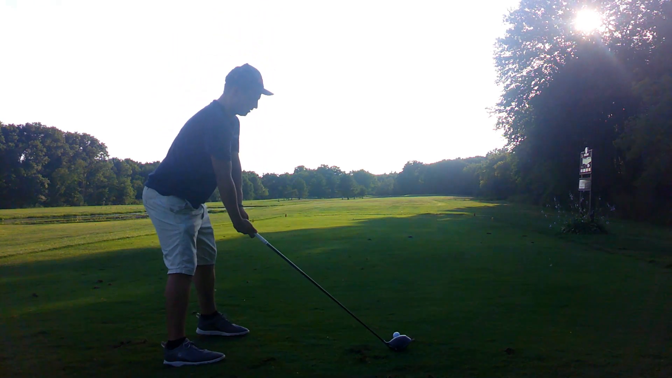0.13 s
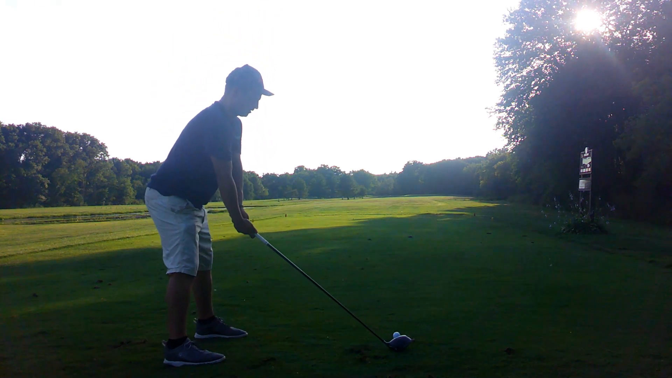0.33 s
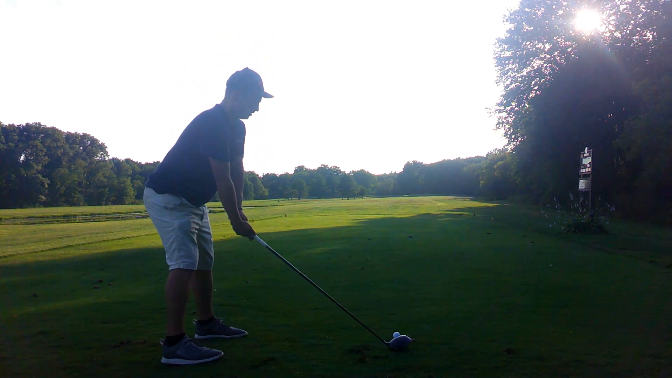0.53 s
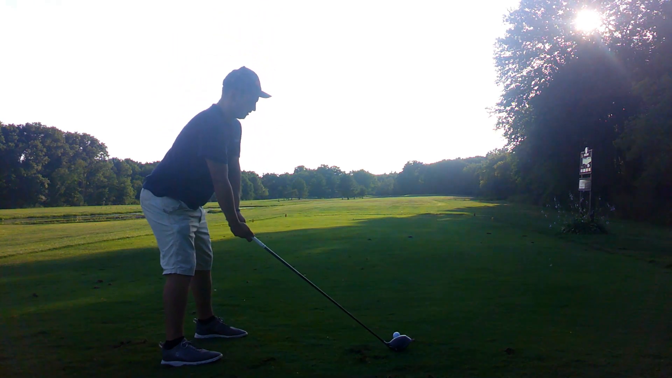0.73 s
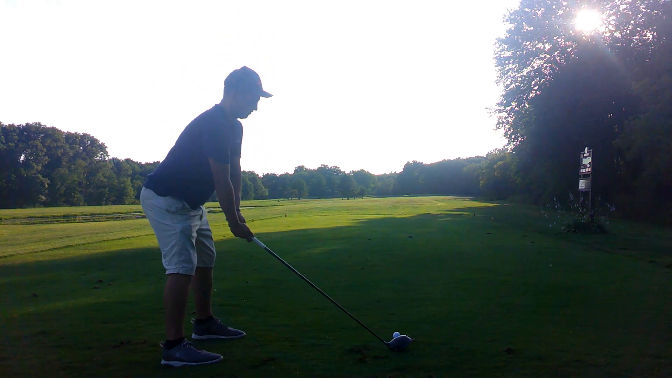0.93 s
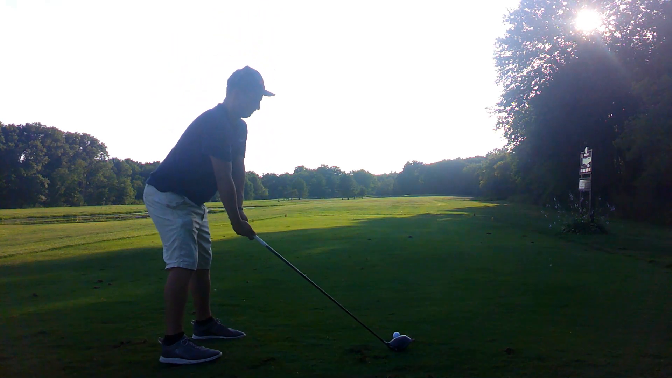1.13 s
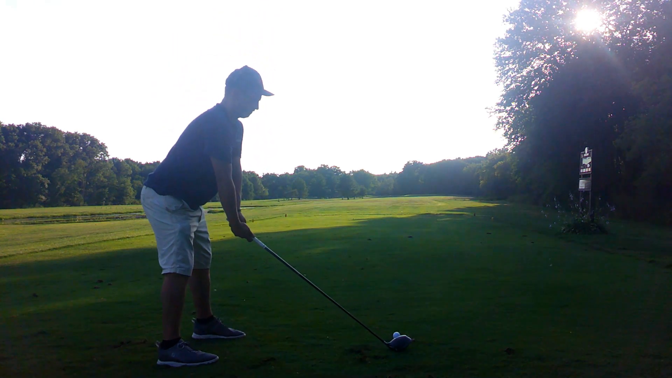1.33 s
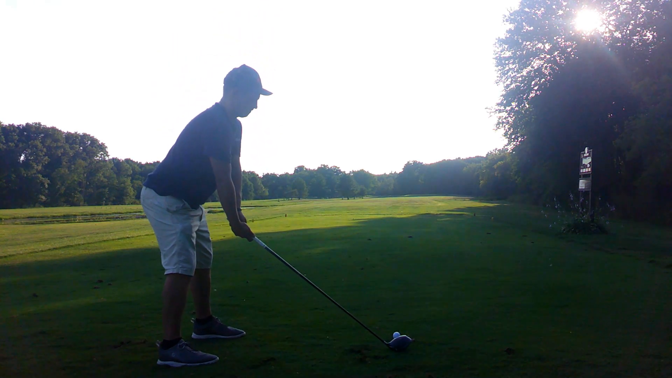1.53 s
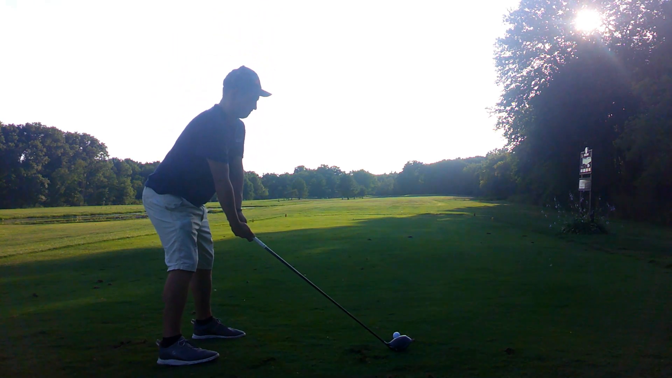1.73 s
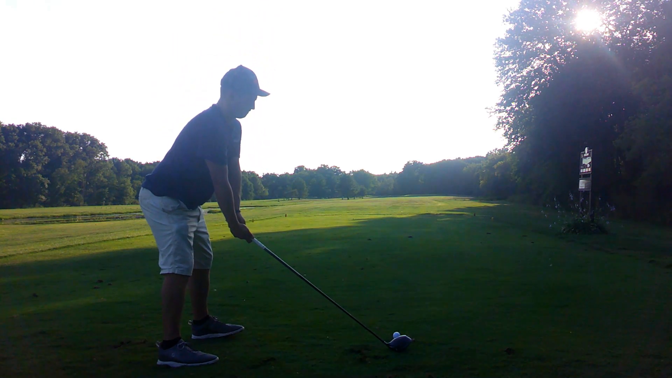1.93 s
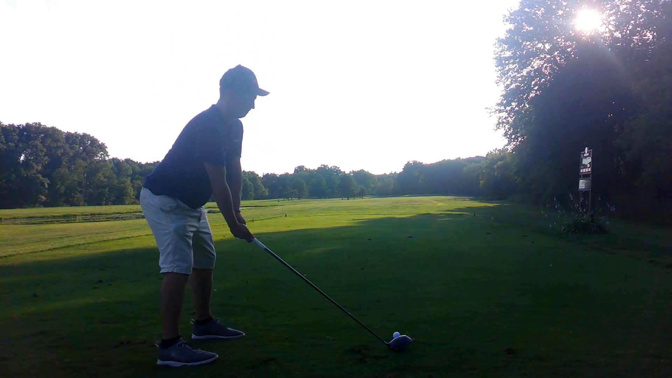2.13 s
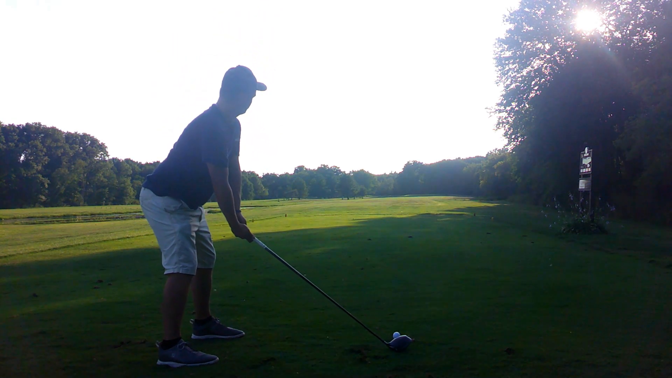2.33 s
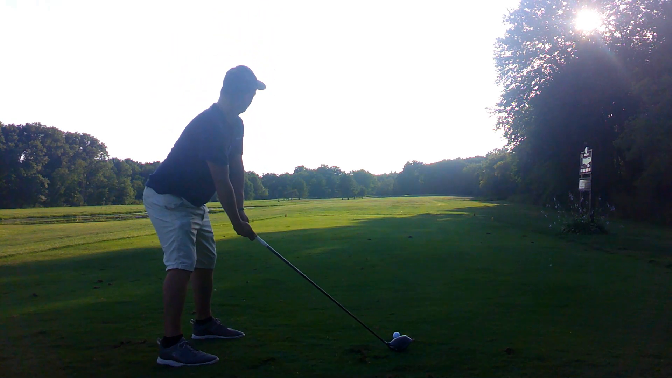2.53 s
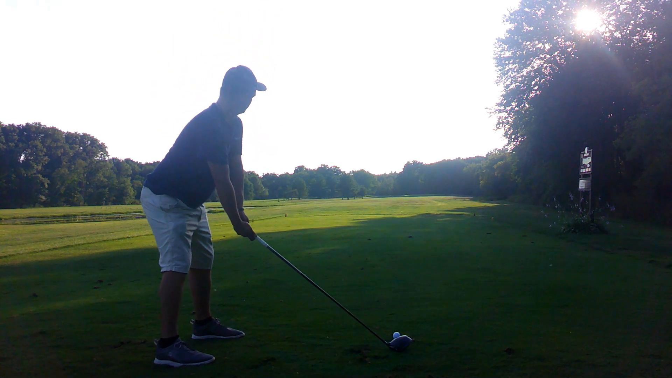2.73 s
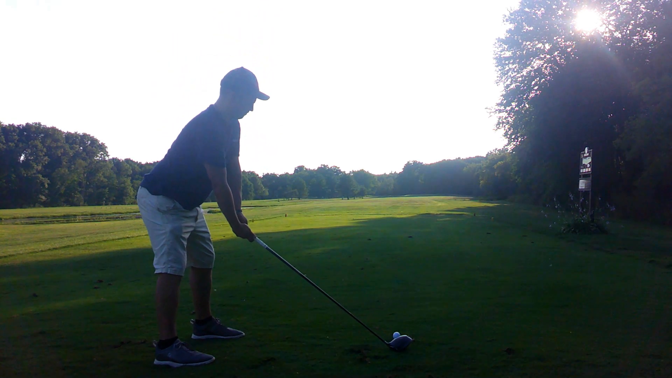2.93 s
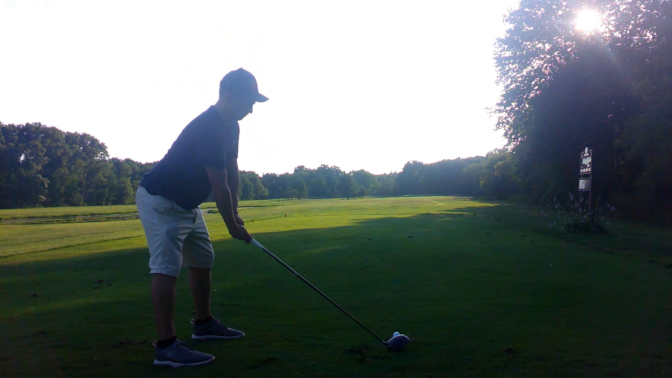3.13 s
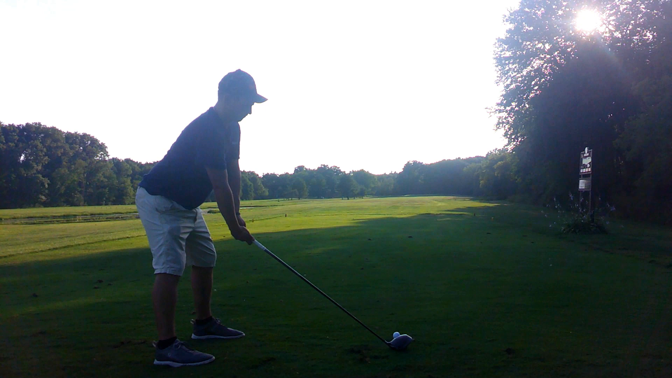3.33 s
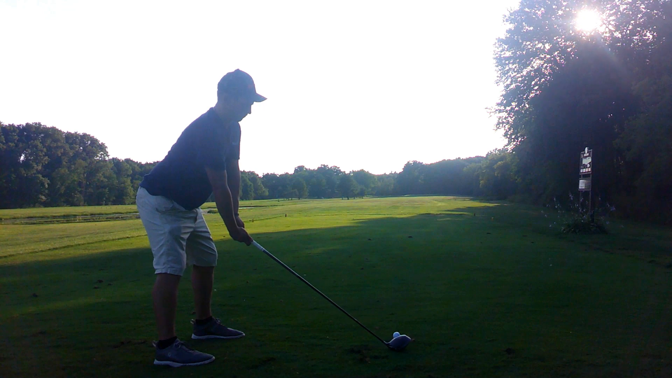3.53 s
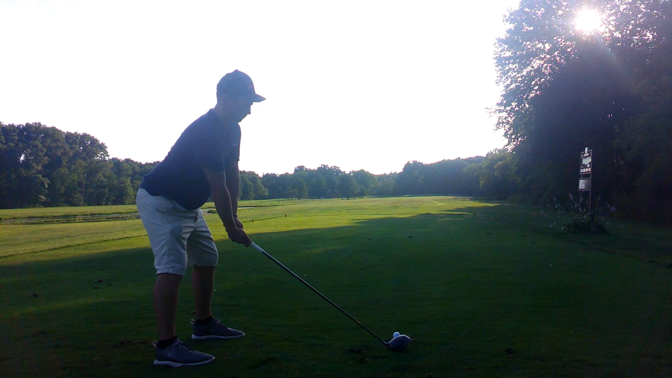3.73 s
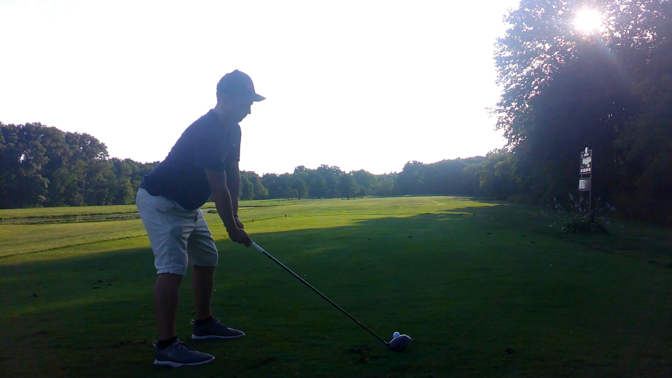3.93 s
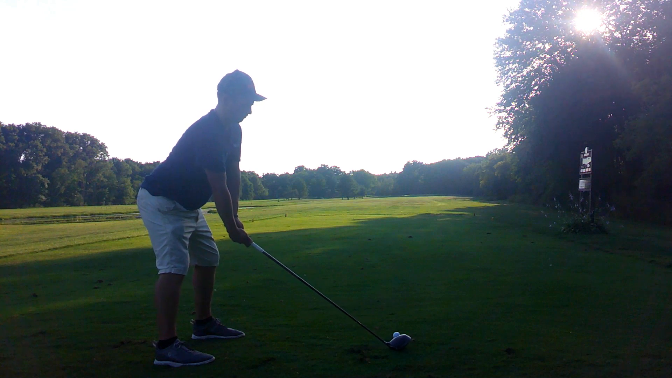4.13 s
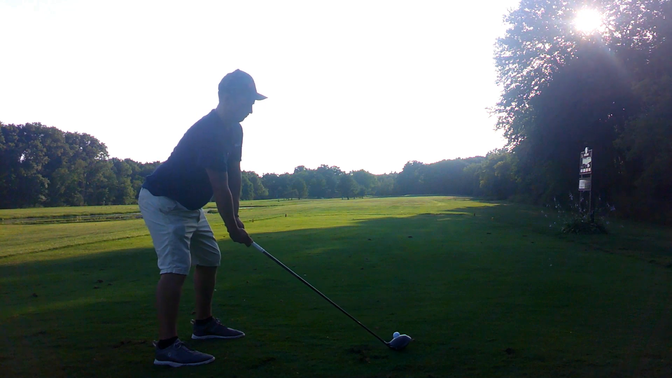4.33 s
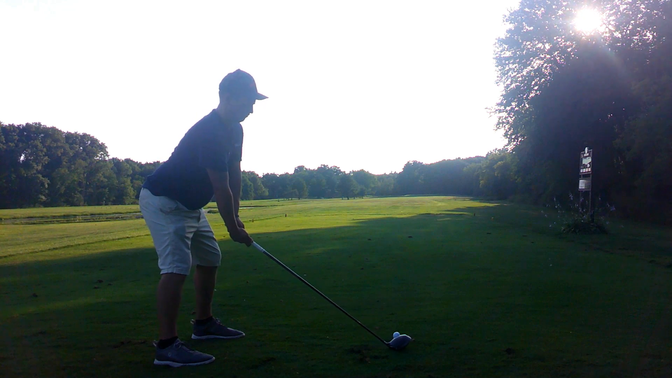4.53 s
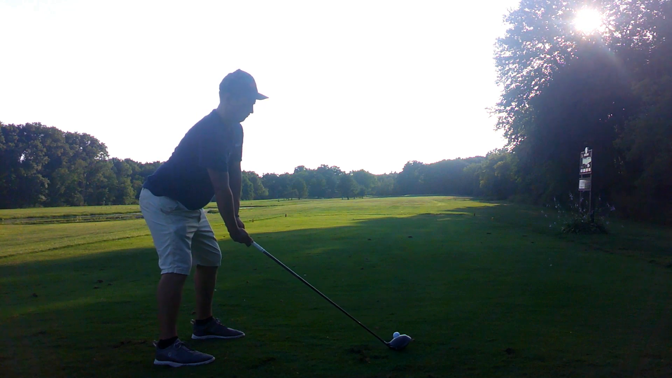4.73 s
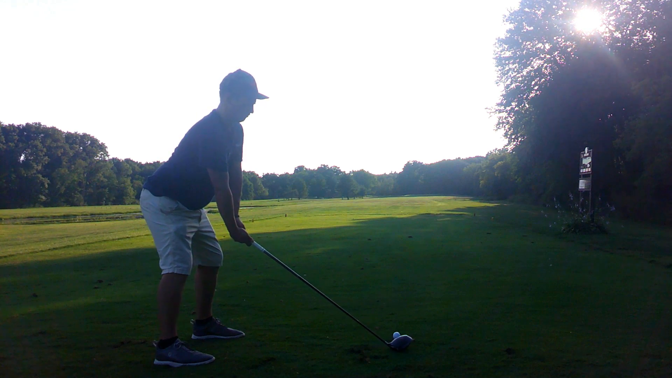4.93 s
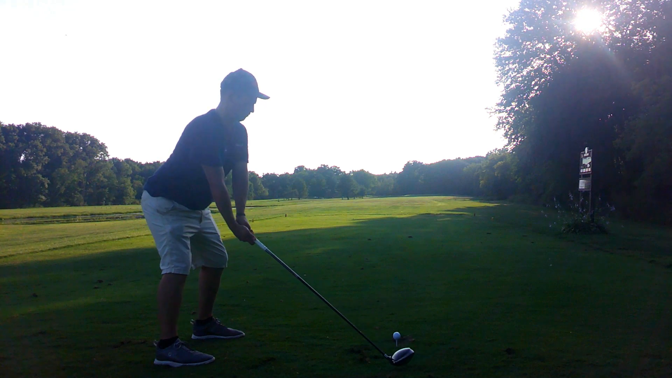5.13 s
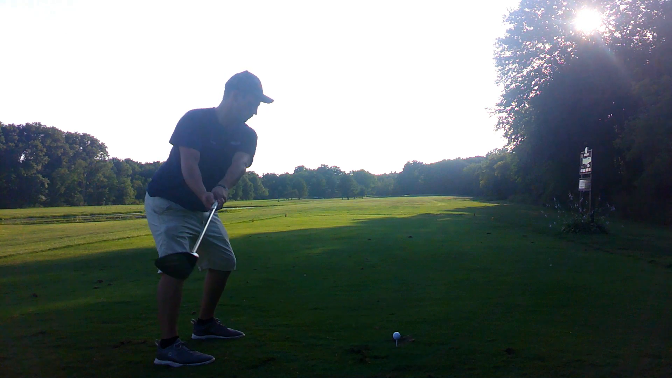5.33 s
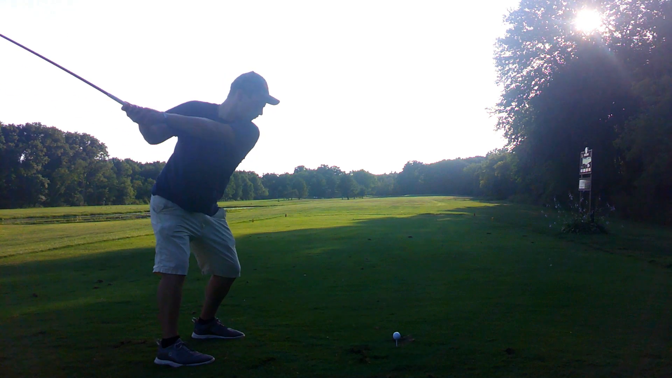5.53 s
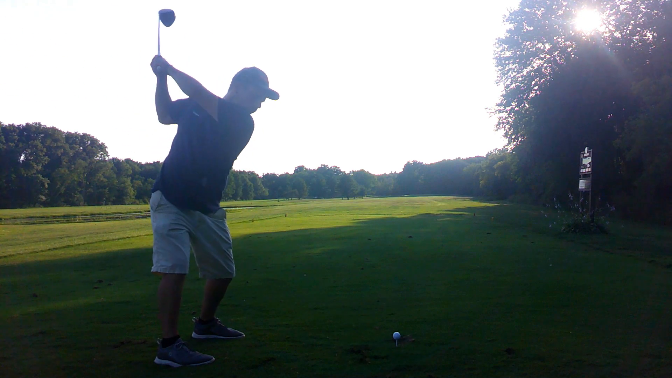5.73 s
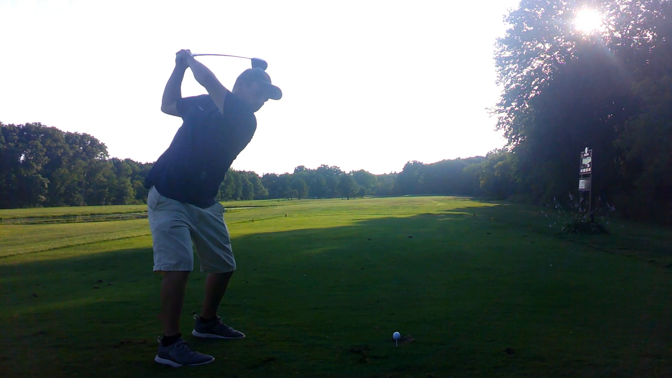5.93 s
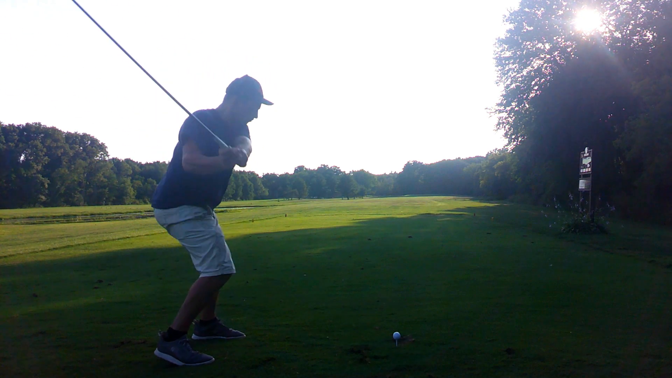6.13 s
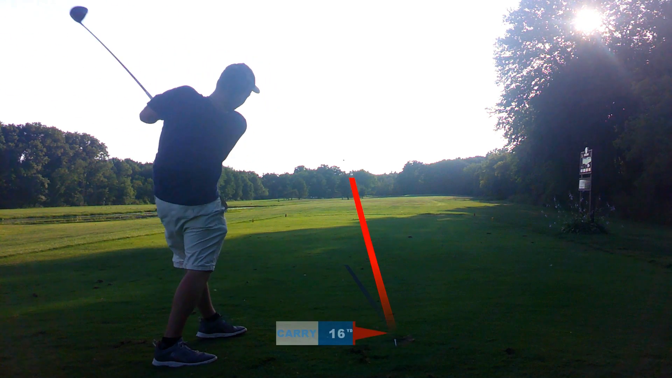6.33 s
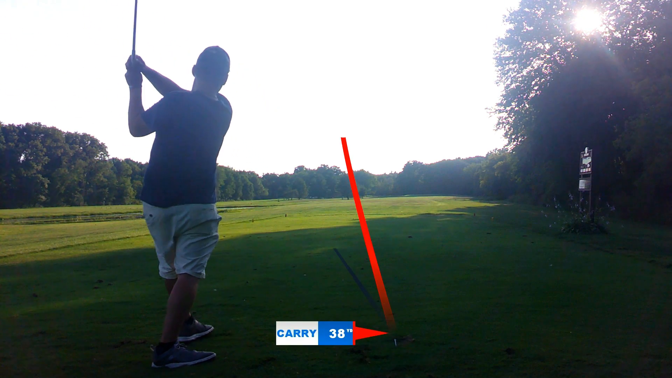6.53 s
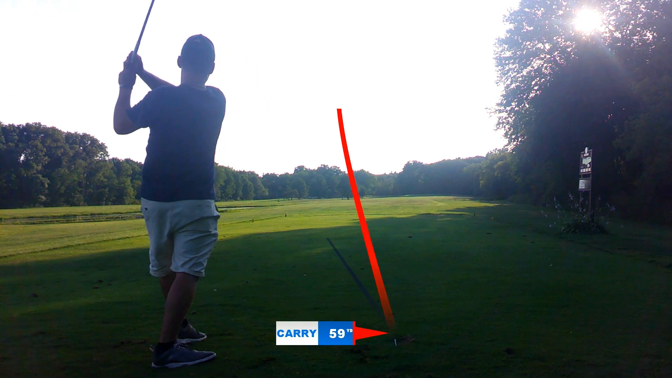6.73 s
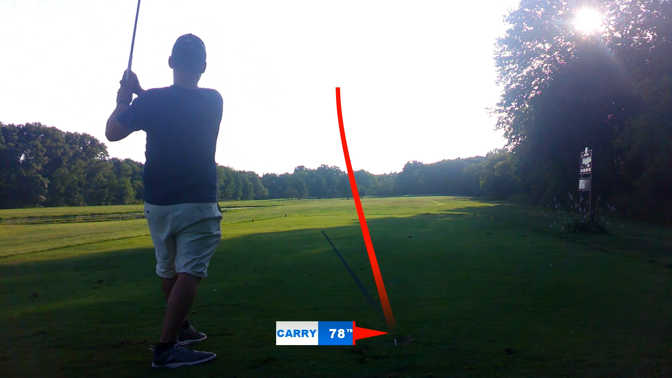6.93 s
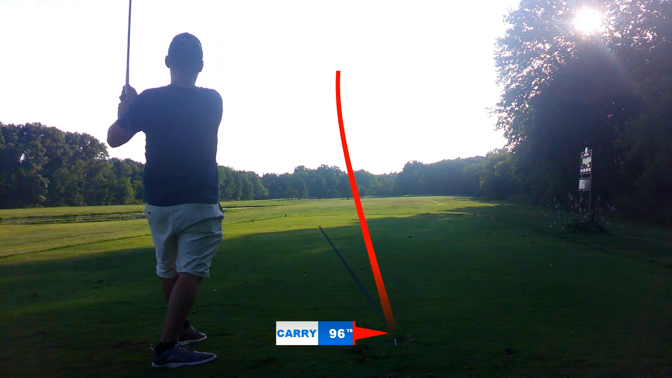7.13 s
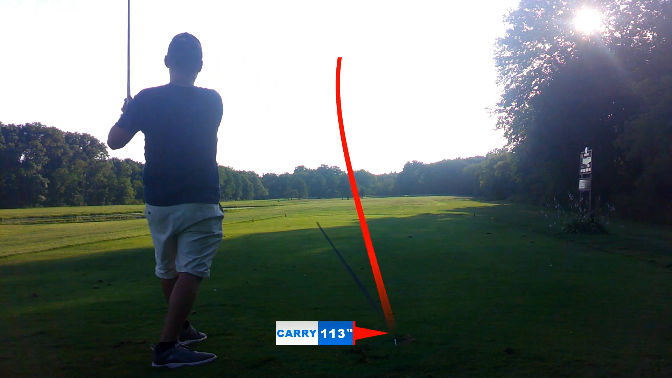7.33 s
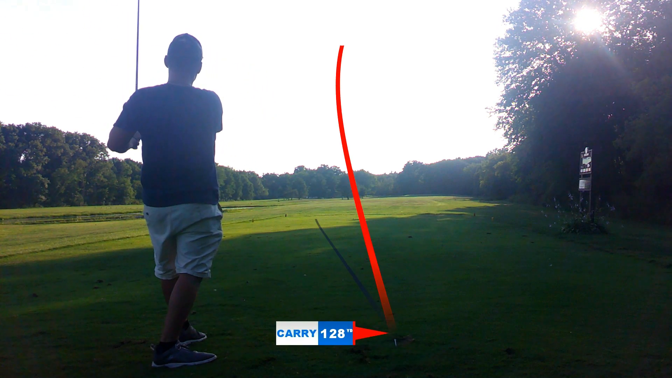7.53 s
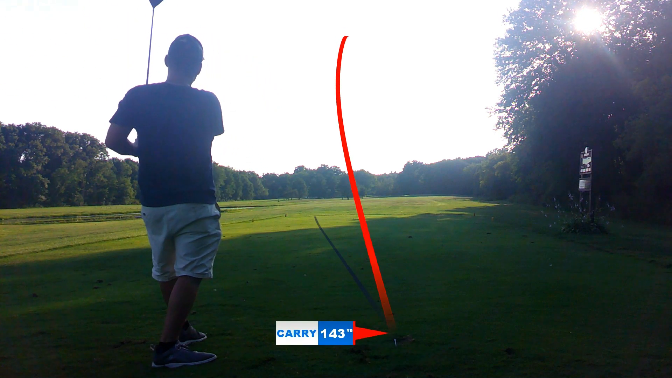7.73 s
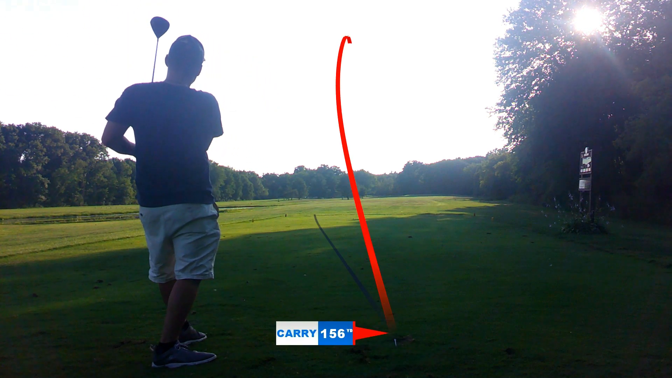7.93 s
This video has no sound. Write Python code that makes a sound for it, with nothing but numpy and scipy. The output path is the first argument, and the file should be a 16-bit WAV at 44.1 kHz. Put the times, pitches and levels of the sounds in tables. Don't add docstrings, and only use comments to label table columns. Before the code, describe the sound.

Distant road rush swells and recedes over faint leaf hiss before a golf club swishes and smacks a ball with a bright, overloaded metallic crack.

```python
import sys
import numpy as np
from scipy import signal
from scipy.fft import rfft, irfft, next_fast_len
from scipy.io import wavfile
from scipy.ndimage import uniform_filter1d

SR = 44100
rng = np.random.default_rng(int(sys.argv[2]) if len(sys.argv) > 2 else 0)


def gain_from_decibels(decibels):
    exponent = np.asarray(decibels, float) / 20
    return 10 ** exponent


def materialize(psi):
    bounded = np.clip(np.atleast_2d(psi).T, -1, 1)
    quanta = np.round(bounded * 32767).astype(np.int16)
    wavfile.write(sys.argv[1], SR, quanta)


N = 356372
SECONDS = np.arange(N) / SR


def rms_one(x):
    return x / np.sqrt(np.mean(x ** 2) + 1e-20)


def in_time(rows):
    s, *columns = np.transpose(rows)
    return [np.interp(SECONDS, s, column) for column in columns]


def drift(rate_hz):
    r = np.exp(-2 * np.pi * rate_hz * 40 / SR)
    noise = rng.standard_normal(N // 40 + 2002)
    slow = signal.lfilter([1], [1, -2 * r, r * r], noise)[2000:]
    return np.interp(np.arange(N) / 40, np.arange(len(slow)), rms_one(slow))


def coloured(spectrum):
    hz, level_db = np.transpose(spectrum)
    size = next_fast_len(N)
    grid_hz = np.arange(size // 2 + 1) * SR / size + 1
    shape = gain_from_decibels(np.interp(np.log(grid_hz), np.log(hz), level_db, left=-90, right=-90))
    return rms_one(irfft(rfft(rng.standard_normal(size)) * shape, size)[:N])


def resonance(x, hz, width_hz):
    r = np.exp(-np.pi * width_hz / SR)
    rise = np.array([1, 0, -1]) * (1 - r * r) / 2
    return signal.lfilter(rise, [1, -2 * r * np.cos(2 * np.pi * hz / SR), r * r], x)


def highpass(x, hz):
    return signal.sosfilt(signal.butter(2, hz, "high", fs=SR, output="sos"), x)


def shape_db(peak_db, at_s, attack_db_s, hold_s, release_db_s):
    t = SECONDS - at_s
    return peak_db - attack_db_s * np.maximum(-t, 0) - release_db_s * np.maximum(t - hold_s, 0)


def bump(at_s, span_s):
    return np.exp(-((SECONDS - at_s) / span_s) ** 2 / 2)


# pitch_hz, level_db (per Hz)
LEAF_SPECTRUM = [(2500, -21), (4000, -5), (5100, -8.5), (6500, -3.5), (8000, -5), (9000, -11.5)]


def meadow():
    leaves = gain_from_decibels(-60 + 0.8 * drift(8.0)) * coloured(LEAF_SPECTRUM)
    hz, width_hz = 5680, 640
    chorus = resonance(rng.standard_normal(N), hz, width_hz)
    chorus = rms_one(resonance(chorus, hz, width_hz))
    return leaves + gain_from_decibels(-58.5 + 1.2 * drift(4.0)) * chorus


# pitch_hz, level_db (per Hz)
RUMBLE_SPECTRUM = [(30, -44.5), (55, -20), (80, -10.5), (130, 2), (220, -1.5), (330, -8.5), (500, -15),
                   (700, -39.5)]
ROAR_SPECTRUM = [(250, -27), (400, -13.5), (600, -4), (850, -0.5), (1100, -3), (1400, -7.5), (2000, -31)]
# pitch_hz, level_db (per Hz)
GRASS_ROAR_SPECTRUM = [(250, -29.5), (400, -16.5), (650, -7.5), (800, -2.5), (950, 4), (1150, -1),
                       (1400, -10), (2000, -31.5)]
RUSH_SPECTRUM = [(700, -28), (1100, -4.5), (1400, 0), (1900, -2), (2500, -9), (3200, -19), (4500, -37)]
HISS_SPECTRUM = [(1800, -27), (2600, 0.5), (3200, -2), (4200, -8), (5500, -18.5), (7000, -26),
                 (9000, -39.5)]
# time_s, engine_db, tyres_db
PASS = [(0, -30.5, -30.5), (.65, -25, -27.5), (1.05, -24.5, -25), (1.45, -24.5, -24), (1.75, -27.5, -24.5),
        (2.1, -27.5, -23), (2.55, -32, -21.5), (2.8, -32.5, -24.5), (3.25, -34.5, -23.5), (3.8, -39.5, -25),
        (4.2, -40.5, -28), (4.65, -46.5, -28), (5.2, -48.5, -31), (5.9, -49.5, -33), (6.6, -50.5, -33.5),
        (7.3, -53.5, -33.5), (8.08, -49, -35.5)]
# full_strength_db, share_of_engine_swing (0-1), share_of_tyre_swing (ratio)
ROAD_LAYERS = [
    (-27, 0.18, 0.55),
    (-21.5, 0.01, 1.002),
    (-22.5, 0.017, 0.54),
    (-35, 0.045, 1.08),
]
# time_s, lift_db, span_s
CARS = [
    (0.1, 2, 0.53),
    (5.45, 2.5, 0.24),
    (7.0, 2, 0.56),
]


def road():
    together_db = 0.39 * drift(12.0) + 0.54 * drift(91.0)
    grass_share = np.clip(0.13 + 0.61 * bump(4.27, span_s=1.55), 0, 1)
    roar = np.sqrt(1 - grass_share) * coloured(ROAR_SPECTRUM)
    roar = roar + np.sqrt(grass_share) * coloured(GRASS_ROAR_SPECTRUM)

    engine_db, tyres_db = in_time(PASS)
    engine_swing_db, tyre_swing_db = engine_db + 24.5, tyres_db + 22
    levels = [db + a * engine_swing_db + b * tyre_swing_db for db, a, b in ROAD_LAYERS]
    levels[2] = levels[2] + sum(db * bump(s, span_s) for s, db, span_s in CARS)

    noises = [coloured(RUMBLE_SPECTRUM), roar, coloured(RUSH_SPECTRUM), coloured(HISS_SPECTRUM)]
    return sum(gain_from_decibels(db + together_db + 0.39 * drift(8.6)) * noise for db, noise in zip(levels, noises))


def waver(turn, orders, lift_db):
    total = 0
    for multiple, db in orders:
        level_db = db + (multiple > 4) * lift_db + 0.95 * drift(3.4)
        phase = multiple * turn + 0.33 * drift(3.3) + np.pi / 3 * multiple ** 2
        total = total + gain_from_decibels(level_db) * np.sin(phase)
    return np.sqrt(2) * total


# multiple (of the base pitch), level_db
ENGINE_TONES = [(2, -8.5), (2.5, -20.5), (3, -1), (3.5, -18), (4, -5), (5, -14), (6, -15), (7, -15),
                (8, -19), (10, -20)]
# multiple (of the base pitch), level_db
DRONE_TONES = [(2, -6), (3, -2.5), (4, -4), (5, -2)]


def engine():
    speed_m_s, distance_m, closest_s, sound_m_s = 37.7, 83, 1.4, 343
    along_m = speed_m_s * (SECONDS - closest_s)
    leaving_m_s = speed_m_s * along_m / np.hypot(along_m, distance_m)
    hz = 42.66 / (1 + leaving_m_s / sound_m_s)
    cruise_hz, ease_hz = 40.5, 0.25
    hz = cruise_hz + ease_hz * np.logaddexp(0, (hz - cruise_hz) / ease_hz)
    turn = 2 * np.pi * np.cumsum(hz) / SR

    lift_db = -3.5 + 8.5 * np.minimum(SECONDS / 3, 1)
    near = gain_from_decibels(in_time(PASS)[0]) * waver(turn, ENGINE_TONES, lift_db)
    drone_db = shape_db(-42, at_s=4.1, attack_db_s=4, hold_s=1.7, release_db_s=3.3)
    return near + gain_from_decibels(drone_db) * waver(turn, DRONE_TONES, lift_db=0)


# delay_s, spread_s, favoured_hz, width_hz, lift_db
TREES = [
    (.045, .012, 5000, 2000, 9.5),
    (.064, 0.009, 3470, 400, 16),
    (.082, 0.008, 4390, 300, 12),
    (.09, 0.011, 3500, 450, 16),
    (0.139, .014, 3900, 300, 15),
    (.17, .03, 6500, 2000, 0.2),
    (.298, 0.016, 6300, 1500, 10),
    (.34, 0.051, 6000, 2500, 6),
    (.07, 0.017, 7760, 2500, 4),
]


def trees(x):
    lag_s = np.arange(int(0.6 * SR)) / SR
    response = 0
    for delay_s, spread_s, hz, width_hz, lift_db in TREES:
        level = gain_from_decibels(-30.5 - 77 * delay_s) / np.sqrt(spread_s * SR)
        cluster = np.exp(-((lag_s - delay_s) / spread_s / 2) ** 2)
        smear = level * cluster * rng.standard_normal(len(lag_s))
        response = response + smear + gain_from_decibels(lift_db) * resonance(smear, hz, width_hz)
    echo = signal.fftconvolve(x, response)[:N]
    return highpass(echo, 1800)


# pitch_hz, width_hz, level_db
WHOOSH_BANDS = [(210, 110, -9), (329, 120, -3), (580, 200, -6), (820, 270, -6), (1670, 280, -14.5)]


def swing():
    soft = signal.butter(2, 2200, fs=SR, output="sos")
    white = signal.sosfilt(soft, rng.standard_normal(N))
    whoosh = 0
    for k, (hz, width_hz, db) in enumerate(WHOOSH_BANDS):
        whoosh = whoosh + gain_from_decibels(db) * (-1) ** k * resonance(white, hz, width_hz)

    shaft_hz = 755 * (1 + 0.12 * bump(6.132, span_s=0.005))
    shaft_db = shape_db(3, at_s=6.123, attack_db_s=700, hold_s=0.028, release_db_s=350)
    phase = 2 * np.pi * np.cumsum(shaft_hz) / SR + 0.67 * drift(60.0)
    shaft = gain_from_decibels(shaft_db + 1.4 * drift(80.0)) * np.sin(phase)

    swish = gain_from_decibels(2.5) * rms_one(resonance(rng.standard_normal(N), 5000, 2400))
    whoosh_db = shape_db(-19.5, at_s=6.126, attack_db_s=380, hold_s=0.01, release_db_s=170)
    swish_db = shape_db(-43.5, at_s=6.115, attack_db_s=450, hold_s=0.075, release_db_s=370)
    sounding = (SECONDS > 6.07) & (SECONDS < 6.25)
    return sounding * (gain_from_decibels(whoosh_db) * (rms_one(whoosh) + shaft) + gain_from_decibels(swish_db) * swish)


# pitch_hz (at the blow), level_db, fade_s (to fall 60 dB), build_up_s
HEAD_TONES = [(1892, -9.5, 0.048, 0.0013), (2610, -9.5, 0.083, 0.0034), (3372, 1.5, 0.06, 0.01),
              (3520, -4.5, .15, 0.013), (3660, -9.5, 0.092, 0.0065), (4390, -21, 0.15, .006),
              (4817, -15, 0.22, 0.018), (5450, -10.5, 0.28, 0.0055), (5990, -8.5, .06, .002),
              (6240, -1.7, .1, .001), (5800, -11, 0.11, .004), (6900, -16.5, 0.23, .016),
              (7587, -17, 0.11, .002), (8400, -20, 0.14, .002)]


def head_ring(after_s):
    turned = np.clip((after_s - 0.012) / 0.054, 0, 1)
    pitch = 1 + 0.055 * np.sin(np.pi / 2 * turned) ** 2
    live = (after_s > 0) & (after_s < 0.2)
    age_s = after_s[live]
    heard_s = np.array([np.cumsum(pitch[live]) / SR, age_s])
    ring = np.zeros((2, N))
    for hz, db, fade_s, build_up_s in HEAD_TONES:
        level = gain_from_decibels(db - 60 * age_s / fade_s + 2.2 * drift(170.0)[live])
        build_up = 1 - np.exp(-age_s / build_up_s)
        ring[:, live] += level * build_up * np.sin(2 * np.pi * hz * heard_s)
    facing_db = shape_db(-1.5, at_s=6.196, attack_db_s=90, hold_s=0.016, release_db_s=900)
    return gain_from_decibels(facing_db) * ring


# pitch_hz, level_db (per Hz)
CRACK_SPECTRUM = [(60, -19.5), (250, -5), (520, -7), (880, 2.5), (1250, -5), (2400, -7.5), (3200, -11),
                  (4500, -30)]
# pitch_hz, level_db (per Hz)
SPRAY_SPECTRUM = [(1100, -25.5), (1700, -3.5), (2600, -0.5), (4200, -7.5), (6000, -3.5), (8000, -8.5),
                  (8800, -8.5)]


def impact(after_s):
    fading_s = np.maximum(after_s - 0.022, 0)
    crack_db = -12 - 99 * after_s - 60 * fading_s / 0.025
    crack = gain_from_decibels(crack_db) * (after_s > 0) * coloured(CRACK_SPECTRUM)
    spray = gain_from_decibels(-9 - 60 * after_s / 0.085) * (1 - np.exp(-after_s / 0.0012)) * coloured(SPRAY_SPECTRUM)
    thump = -gain_from_decibels(-7.0 - 60 * after_s / 0.0058) * np.sin(2 * np.pi * 450 * after_s)
    return crack + spray + thump


def strike():
    after_s = np.maximum(SECONDS - 6.1719, 0)
    ring, unshifted = head_ring(after_s)
    return gain_from_decibels(6.0) * np.array([ring, unshifted, impact(after_s)])


def scene():
    ring, unshifted, crack = strike()
    sway = rms_one(signal.lfilter([1], [1, -np.exp(-2 * np.pi * 300 / SR)], rng.standard_normal(N)))
    sideways = unshifted - 0.48 * resonance(unshifted, 6200, 400)
    to_trees = sideways * (0.5 + 1.05 * sway) + gain_from_decibels(4.5) * crack
    background = meadow() + road() + engine()
    return (background + gain_from_decibels(-0.5) * trees(to_trees) + swing() + ring + crack)[None]


def roll_off(x):
    return signal.sosfilt(signal.butter(12, 8700, fs=SR, output="sos"), x)


def record(dry):
    limit_db, release_db_s, overload = -2.5, 56.5, 0.93
    loudness_db = 10 * np.log10(uniform_filter1d(dry ** 2, size=132) + 1e-12)
    over_db = np.maximum(loudness_db - limit_db, 0)
    ramp_db = release_db_s * SECONDS
    held_db = np.maximum.accumulate(over_db + ramp_db, axis=-1) - ramp_db
    cut_db = signal.lfilter([0.01], [1, -0.99], held_db)
    rounded = overload * np.tanh(dry * gain_from_decibels(-cut_db) / overload)
    thin = highpass(rounded, 35)
    narrow = signal.sosfilt(signal.cheby2(10, 60, 9610, fs=SR, output="sos"), thin)
    return roll_off(narrow)


dry = scene()
out = record(dry)
materialize(out)
```